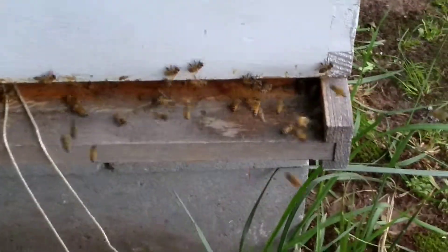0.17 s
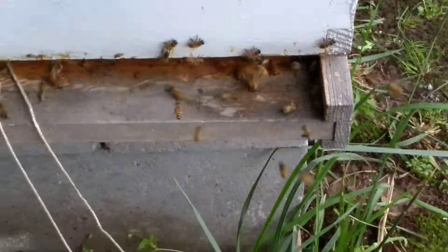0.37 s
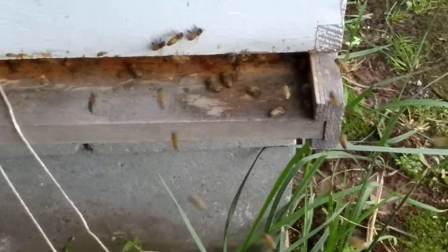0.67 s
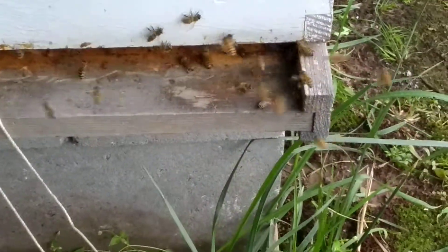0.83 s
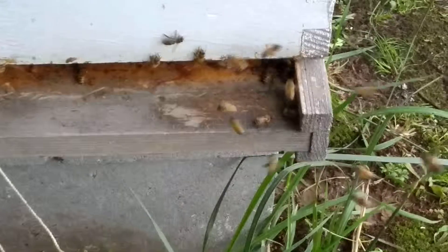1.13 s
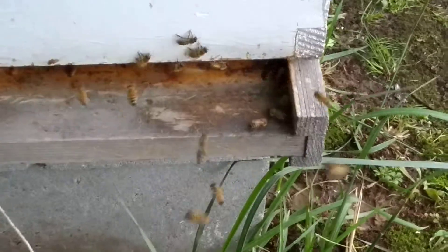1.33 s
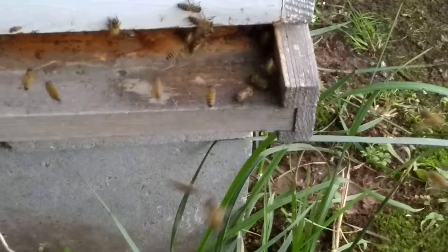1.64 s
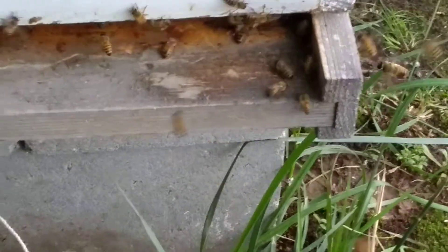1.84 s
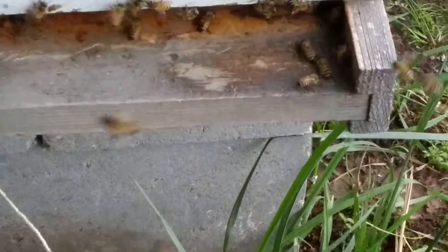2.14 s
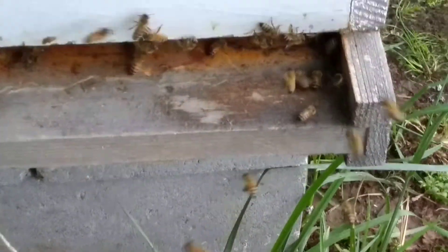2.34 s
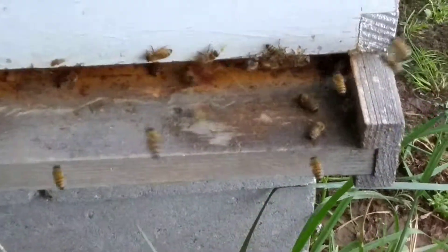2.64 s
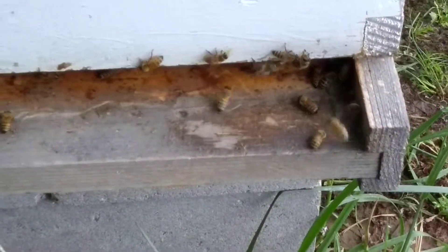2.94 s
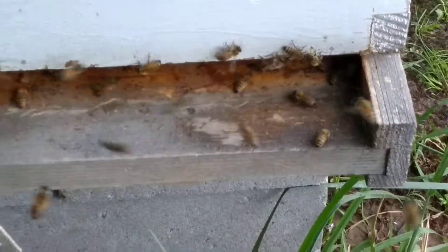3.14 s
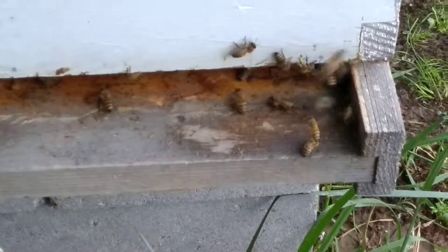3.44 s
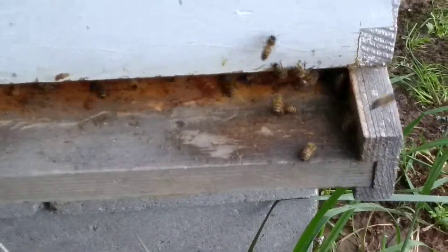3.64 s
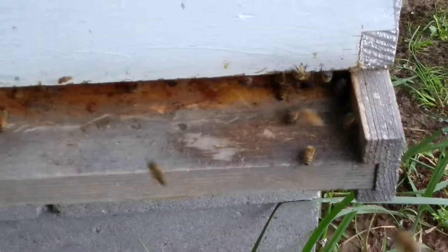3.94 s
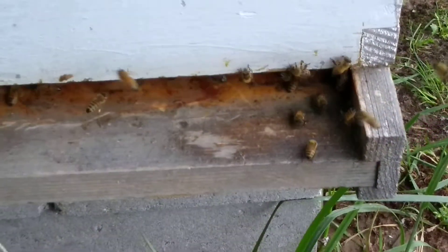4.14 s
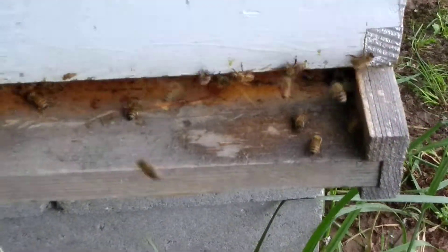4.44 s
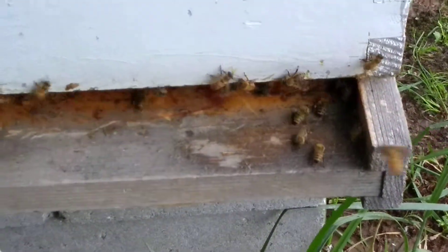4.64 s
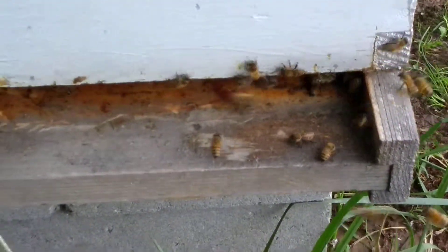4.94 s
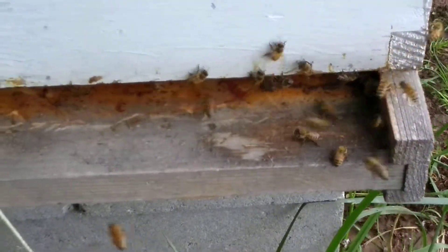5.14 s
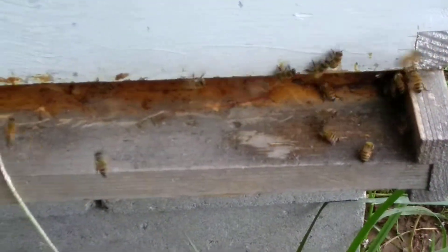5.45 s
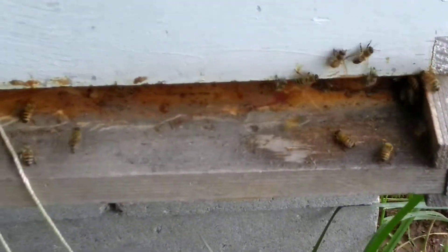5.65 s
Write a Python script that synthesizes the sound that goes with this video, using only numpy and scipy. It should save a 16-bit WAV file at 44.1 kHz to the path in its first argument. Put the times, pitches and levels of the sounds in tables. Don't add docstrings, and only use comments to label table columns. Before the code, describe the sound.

Throughout six seconds outdoors, a dense swarm of honeybees hums around 200 to 250 Hz, wavering and swelling as knots of bees pass, notably around 0.4-0.9, 1.85 and 4.8 s. The yard's soft airy background rises in at the start, with a faint low engine on the left gone by 1.1 s. Fingers tap and rub the left microphone from 0.27 to 1.0 s, hardest at 0.5 and 0.8, then thud heavily at 1.55 with a lesser bump at 1.85 and a dull one at 3.99. Low wind puffs thump the right side intermittently, densest around 1-1.5 s. A few bird peeps precede a thrush whistling quick gliding phrases, blurred by foliage, at about 1.3, 1.7, 2.4, 2.9, 3.6, 4.2 and 4.9 s; thin rising chirps follow at 5.3. One bee buzzes close at 2.5-2.95 and 3.2-3.5 s. Hiss and background dip after bumps and creep back.

```python
import sys
import numpy as np
from scipy import signal
from scipy.fft import rfft, irfft
from scipy.io import wavfile
from scipy.ndimage import uniform_filter1d

SR = 44100
rng = np.random.default_rng(int(sys.argv[2]) if len(sys.argv) > 2 else 0)


def transcribe(signal):
    frames = np.atleast_2d(signal).T
    limited = np.clip(frames, -1, 1)
    pcm = np.round(limited * 32767).astype(np.int16)
    wavfile.write(sys.argv[1], SR, pcm)


def boost_factor(decibels):
    exponent = np.asarray(decibels, float) / 20
    return 10 ** exponent


N = 255780

# [time_s, hiss_level_db]
RECORDER_GAIN = [(0, -62.5), (.3, -60), (.86, -61), (1.1, -60), (1.56, -59), (1.59, -64), (1.98, -62),
                 (2.4, -57.5), (2.77, -53.5), (3.05, -55), (3.51, -53.5), (3.55, -62.5), (4.16, -57.5),
                 (4.68, -56), (4.94, -51.5), (5.07, -57), (5.35, -55), (5.8, -56)]
# [time_s, rise_db]
SWARM_SURGES = [(.12, -6), (.4, 6.5), (.6, 4), (.9, 5.5), (1.25, 3), (1.84, 6), (2.14, 2.5), (2.68, 2.5),
                (3.039, 3.5), (3.72, 1.5), (4.1, 0.5), (4.74, 4.5), (4.9, 4), (5.1, 1), (5.65, 0)]
# [time_s, wingbeat_hz, level_db]
NEAR_BEE_VISITS = [
    [(2.45, 222.6, -54), (2.7, 242.3, -43.5), (2.764, 248, -49), (2.796, 232.5, -61), (2.87, 239.3, -46.5),
     (2.932, 238.2, -45), (2.95, 241.7, -61)],
    [(3.2, 237.3, -64), (3.25, 243.3, -44), (3.44, 241.3, -48.5), (3.462, 238, -67), (3.5, 240.1, -39)],
]
# [wingbeat_multiple, level_db]
WING_OVERTONES = [(1, -1), (2, 1.5), (3, -13), (4, -18), (5, -11.5), (6, -10), (7, -45), (8, -27)]
# [delay_s, length_s, first_hz, last_hz, level_db]
FALLING_PHRASE = [
    (-.07, .04, 2660, 2750, -4),
    (-.012, .013, 2950, 3720, -6),
    (0, .05, 3883, 2840, 0.5),
    (.052, .027, 2430, 2050, -5),
    (.085, .052, 2170, 2230, 5.5),
]
# [delay_s, length_s, first_hz, last_hz, level_db]
WHISTLED_PHRASE = [
    (-.066, .015, 2863, 3450, -10),
    (-.053, .058, 3253, 3350, 0),
    (-.005, .022, 3796, 2350, -2),
    (.018, .03, 2340, 2060, -10),
    (.058, .042, 3020, 2660, -0.5),
    (.104, 0.0324, 2660, 2436, -2.5),
    (.148, .045, 2150, 2085, -2),
]
# [time_s, opening_db, closing_db]
FALLING_TIMES = [
    (1.264, -40.5, -40),
    (2.369, -35.5, -41),
    (4.21, -34.5, -37.5),
]
# [time_s, opening_db, closing_db]
WHISTLED_TIMES = [
    (1.728, -50, -44),
    (2.943, -35.5, -34),
    (3.596, -45, -42.5),
    (4.949, -31, -38.5),
]
# [start_s, length_s, first_hz, last_hz, level_db]
STRAY_NOTES = [
    (.667, 0.034, 3050, 3064, -40),
    (.712, .067, 2680, 2250, -52),
    (.813, .09, 2450, 2260, -49),
    (3.346, 0.041, 3330, 3304, -48.5),
    (3.994, 0.041, 3340, 3320, -61),
    (5.325, .022, 3050, 3520, -47),
    (5.346, .018, 3010, 3520, -50),
    (5.35, .07, 3750, 4040, -48.5),
]
# [time_s, pitch_hz, level_db]
ENGINE_TONE = [
    (0, 104.3, -37),
    (.3, 106.1, -36),
    (.6, 105.3, -36),
    (.9, 99.7, -38),
    (1.1, 98.5, -39),
]
# [start_s, peak_db, swing_hz, direction, tick_db]
FINGER_TAPS = [(0.27, -13.5, 463, -0.66, -27.5), (0.375, -8.5, 224, 0.94, -29.5),
               (0.392, -15, 336, 0.81, -47), (.4045, -19, 340, 0.96, -19.5), (0.435, -16, 210, -1.5, -50),
               (0.4992, -4.5, 300, -1.15, -16.5), (.567, -18, 204, -0.9, -41),
               (.586, -13.5, 260, -1.2, -46), (0.716, -13, 270, -1.5, -46), (0.815, -3, 302, -0.8, -17),
               (1.5544, -2, 310, 0.95, -23), (1.567, 0, 180, -0.62, -24), (1.596, -20, 400, -0.65, -51),
               (1.8464, -21.5, 306, -1.23, -28.5), (3.9865, -10.5, 242, -1.53, -60)]
# [start_s, length_s, level_db]
SKIN_RUBS = [
    (0.373, 0.042, -43),
    (0.417, 0.014, -35.5),
    (0.501, 0.028, -37),
    (0.533, 0.09, -33.5),
    (0.717, 0.016, -36),
    (0.849, 0.095, -39.5),
    (0.973, 0.1, -46),
]
# [frequency_hz, level_db_per_hz]
RUB_COLOUR = [(150, -8), (500, -5), (1500, -9), (3500, -10.5), (6000, -19), (10000, -31), (15000, -49)]
# [centre_s, peak_db, swing_hz, direction]
WIND_PUFFS = [(.552, -14, 139, -0.72), (0.656, -22.5, 99, -1.3), (0.963, -12, 121, 0.39),
              (0.995, -18, 118, 0.89), (1.078, -18, 82, 0.87), (1.112, -14, 84.5, 0.84),
              (1.163, -18.5, 156, 1), (1.1924, -9.5, 89.5, -0.96), (1.297, -19, 69, -1.1),
              (1.389, -12, 86, 0.76), (1.552, -7.5, 108, 0.63), (2.406, -17, 89.5, 0.89),
              (3.0934, -15.5, 95, -1), (3.5388, -13.5, 95, -1.14), (4.315, -22, 111, -0.84),
              (4.324, -10.5, 89.5, -1), (4.3346, -12.5, 129, -0.99), (4.391, -17, 88, 1),
              (5.031, -15, 76.5, 0.49), (5.393, -21, 75, -0.89), (5.7825, -14, 90, -0.78)]
# [time_s, level_db]
WIND_GUSTS = [(.42, -39), (.72, -41), (1.87, -34.5), (2.3, -37.5), (2.5, -33.5), (2.7, -52), (2.9, -41),
              (4.0, -44), (4.7, -48), (5.6, -43)]
# [frequency_hz, level_db_per_hz]
AIR_COLOUR = [(40, 9.5), (100, 6.5), (200, -1), (350, -11), (600, -15.5), (1000, -20.5), (1600, -34),
              (2100, -18), (2700, -27.5), (3400, -19), (4000, -72), (4800, -40), (7000, -36), (15000, -60)]
# [frequency_hz, level_db_per_hz]
DIFFUSE_COLOUR = [(40, 6), (100, 2), (250, -12), (600, -15.5), (1200, -18), (2100, -18.5), (3000, -19),
                  (4000, -19), (5500, -36.5), (15000, -50)]
# [frequency_hz, level_db_per_hz]
HISS_COLOUR = [(3300, -5), (4300, 3.5), (6000, 2.5), (10000, 0), (15000, -1)]


def curve(table):
    s, *columns = np.transpose(table)
    t = np.arange(N) / SR
    return [np.interp(t, s, c) for c in columns] + [(t > s[0]) & (t < s[-1])]


def unit(x):
    return x / np.sqrt(np.mean(x ** 2))


def walk(rate_hz):
    steps = np.repeat(rng.standard_normal(int(N * rate_hz / SR) + 2), repeats=8)
    steps = uniform_filter1d(uniform_filter1d(steps, size=8), size=8)
    return 1.3 * np.interp(np.arange(N) * rate_hz / SR, np.arange(len(steps)) / 8, steps)


def noise(colour, flicker_db, rate_hz):
    log_hz = np.log(np.fft.rfftfreq(N, 1 / SR) + 1)
    colour_hz, colour_db = np.transpose(colour)
    shape = boost_factor(np.interp(log_hz, np.log(colour_hz), colour_db, left=-60))
    full = rfft(rng.standard_normal(N)) * shape
    octave = log_hz / np.log(2)
    total = 0
    for k in range(int(np.log2(colour_hz[0])), 15):
        band = irfft(full * np.clip(1 - abs(octave - k), 0, 1), N)
        total = total + band * boost_factor(flicker_db * walk(rate_hz))
    return unit(total)


def add(track, start_s, sound):
    i = int(start_s * SR)
    track[i:i + len(sound)] += sound[:N - i]


def ports(x, lag, left_db):
    i = np.arange(N)
    left = np.interp(i - lag, i, x) * boost_factor(left_db)
    return np.array([left, x])


def gain():
    return curve(RECORDER_GAIN)[0]


def crowd():
    swarm_over_hiss_db, surge_s = 5, 0.088
    t = np.arange(0, N / SR + .01, .01)
    swell = sum(db * np.exp(-((t - s) / surge_s) ** 2) for s, db in SWARM_SURGES)
    return gain() + swarm_over_hiss_db + np.interp(np.arange(N) / SR, t, swell)


def wings(hz):
    turn = np.cumsum(hz * (1 + 0.01206 * walk(60))) / SR
    cycle = np.linspace(0, 1, 257)
    stroke = sum(boost_factor(db) * np.sin(2 * np.pi * (k * cycle + rng.random())) for k, db in WING_OVERTONES)
    return unit(np.interp(turn % 1, cycle, stroke)) * boost_factor(3.1 * walk(40))


def bees(swarm_db):
    swarm = 0
    for hz, side in zip(np.linspace(198, 252, num=14), rng.random(14)):
        bee = wings(hz * (1 + .04 * walk(6))) * boost_factor(4.0 * walk(5))
        swarm = swarm + ports(bee, 3 + 12 * side, -0.57)
    out = unit(swarm) * boost_factor(swarm_db + 1.5)
    for visit in NEAR_BEE_VISITS:
        hz, db, on = curve(visit)
        fundamental = 2.0 * np.sin(2 * np.pi * np.cumsum(hz) / SR)
        fade = uniform_filter1d(1. * on, size=1500)
        hover = (wings(hz) + fundamental) * boost_factor(db - 1.5) * fade
        out = out + ports(hover, 17.7, -1.1)
    return out


def notes():
    closing_s = .05
    out = list(STRAY_NOTES)
    for phrase, times in [(FALLING_PHRASE, FALLING_TIMES), (WHISTLED_PHRASE, WHISTLED_TIMES)]:
        for s, open_db, close_db in times:
            for delay, length, first_hz, last_hz, note_db in phrase:
                sung_db = close_db if delay > closing_s else open_db
                out.append((s + delay, length, first_hz, last_hz, note_db + sung_db))
    return out


def bird():
    song = np.zeros(N)
    for s, length, first_hz, last_hz, db in notes():
        u = np.linspace(0, 1, int(length * 1.15 * SR))
        hz = last_hz + (first_hz - last_hz) * (1 - u) ** 1.8
        whistle = np.sin(2 * np.pi * np.cumsum(hz) / SR)
        add(song, s - 0.055 * length, boost_factor(db) * np.sin(np.pi * u) ** 0.36 * whistle)
    song = song * boost_factor(2.2 * walk(90))
    t = np.arange(int(.45 * SR)) / SR
    shared, own = rng.standard_normal(len(t)), rng.standard_normal((2, len(t)))
    branches = boost_factor(-28 - 60 * t / .17)
    hedges = boost_factor(-44 - 60 * t / 1.06)
    echo = (0.33 * shared + 0.82 * own) * (branches + hedges) * np.clip(t / 0.0027, 0, 1)
    direct = ports(song, 3.5, -0.7) * boost_factor(-3.0)
    return direct + signal.fftconvolve(song[None], echo, axes=1)[:, :N]


def hand():
    out = np.zeros(N)
    i = np.arange(200)
    tick_shape = np.exp(-i / 30) * np.clip(i / 8, 0, 1)
    for (s, db, hz, way, tick_db), grit in zip(FINGER_TAPS, rng.standard_normal((len(FINGER_TAPS), 200))):
        u = np.arange(int(5 * SR / hz)) * hz / SR
        swing = np.sin(2 * np.pi * 0.9 * u ** 0.87)
        add(out, s, way * 2.35 * boost_factor(db) * swing * (1 - np.exp(-u / 0.25)) * np.exp(-u / 0.4))
        scratch = 2 * uniform_filter1d(uniform_filter1d(grit, size=4), size=4)
        click = 1.5 * way * np.exp(-((i - 12) / 6) ** 2)
        add(out, s + .0004, boost_factor(tick_db - 2) * (scratch + click) * tick_shape)
    pressure = np.zeros(N)
    for s, length, db in SKIN_RUBS:
        add(pressure, s, boost_factor(db) * np.sin(np.linspace(0, np.pi, int(length * SR))) ** .6)
    out = out + pressure * noise(RUB_COLOUR, 1.5, 150) * boost_factor(1.5 * walk(300))
    return np.array([out, -.04 * out])


def gusts():
    under_puff_db, fade_db_per_s, calm_db = -23, 211, -70
    t = np.arange(0, N / SR + .01, .01)
    peaks = list(WIND_GUSTS) + [(s, db + under_puff_db) for s, db, _, _ in WIND_PUFFS]
    power = sum(boost_factor(2 * (db - fade_db_per_s * abs(t - s))) for s, db in peaks)
    return np.interp(np.arange(N) / SR, t, 10 * np.log10(power + boost_factor(2 * calm_db)))


def wind():
    db = gusts()
    band = signal.butter(2, [30, 110], "bandpass", fs=SR, output="sos")
    left, right = (unit(signal.sosfilt(band, rng.standard_normal(N)) * boost_factor(2.5 * walk(25))) for _ in range(2))
    right = right * boost_factor(db + 3.0)
    for s, peak_db, hz, way in WIND_PUFFS:
        u = np.linspace(-2, 2, int(4 * SR / hz))
        flex = np.cos(2 * np.pi * u) * np.exp(-(u / 0.44) ** 2)
        add(right, s - 2 / hz, way * boost_factor(peak_db) * flex)
    return np.array([left * boost_factor(0.55 * db - 11.5), right])


def engine():
    hz, db, on = curve(ENGINE_TONE)
    turn = np.cumsum(hz * (1 + 0.011 * walk(19.4))) / SR
    return ports(np.sin(2 * np.pi * turn) * boost_factor(db) * on, -10, -0.71)


def air(air_db):
    shared = ports(noise(AIR_COLOUR, 0.23, 6.39), 5.4, 0.3)
    own = np.array([noise(DIFFUSE_COLOUR, 1.5, 7), noise(DIFFUSE_COLOUR, 1.5, 7)])
    return (0.94 * shared + 0.5 * own) * boost_factor(air_db + 11.5)


def scene():
    air_over_hiss_db, start_db, rise_s = 8, -7.5, 0.39
    air_db = gain() + air_over_hiss_db + start_db * np.exp(-np.arange(N) / SR / rise_s)
    return bees(crowd()) + bird() + hand() + wind() + engine() + air(air_db)


def roll_off(x):
    return signal.sosfilt(signal.butter(12, 15390, fs=SR, output="sos"), x)


def record(dry):
    port_lag, top_hz = 20, 14380
    hz = np.fft.rfftfreq(N, 1 / SR)
    cross = np.exp(-2j * np.pi * hz * port_lag / SR) / (1 + (hz / 5600) ** 8)
    gain_db = gain()
    left_hiss = noise(HISS_COLOUR, 0.47, 12) * boost_factor(0.56 * gain_db - 29)
    right_hiss = noise(HISS_COLOUR, 1.8, 20) * boost_factor(gain_db + 5)
    hiss = rfft(np.array([left_hiss, right_hiss]), axis=1)
    sound = rfft(dry, axis=1)
    stereo = sound - cross * sound[::-1] + hiss
    mix = irfft(stereo * (hz < top_hz), N, axis=1)
    return roll_off(mix)


dry = scene()
out = record(dry)
transcribe(out)
```